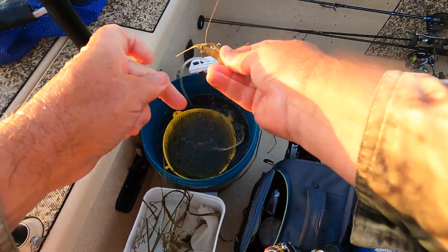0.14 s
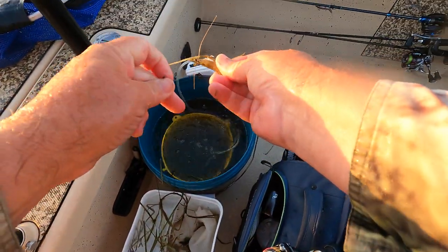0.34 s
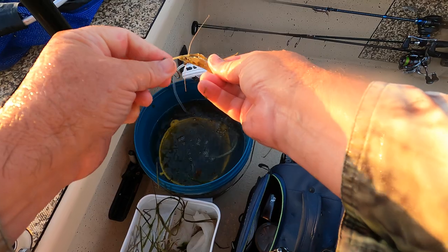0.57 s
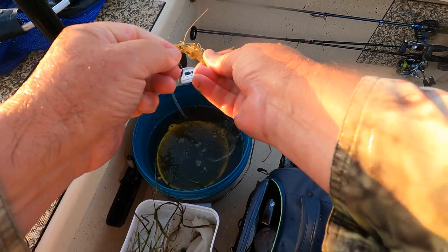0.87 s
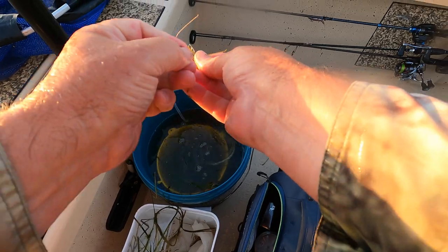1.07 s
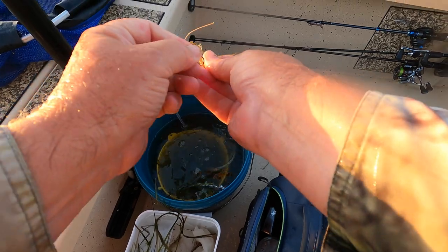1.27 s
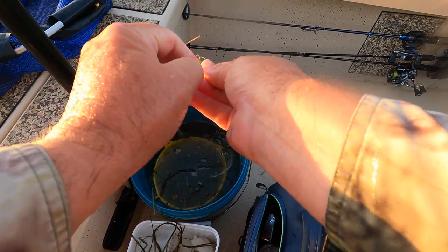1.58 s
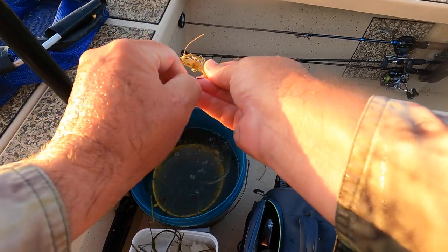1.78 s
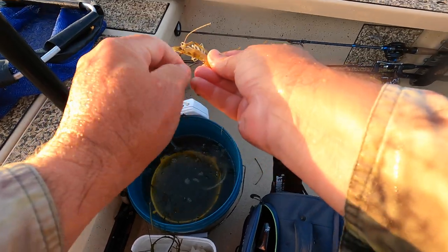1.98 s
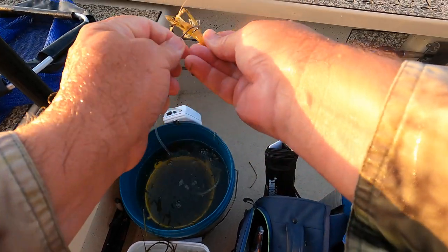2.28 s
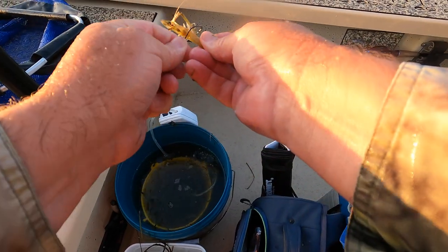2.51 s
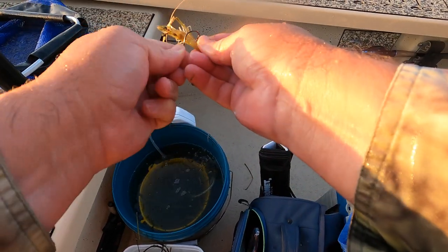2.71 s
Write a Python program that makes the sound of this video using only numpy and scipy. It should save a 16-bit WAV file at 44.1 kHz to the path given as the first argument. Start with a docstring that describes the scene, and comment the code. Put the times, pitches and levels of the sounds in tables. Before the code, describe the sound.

An aerator bubbles in a bucket of water, low gurgle and fine fizz, with small clicks

```python
"""A low wet gurgle under a wash of small bubbles and a fine fizz that swells and fades, with pops and ticks.
An aerator churns the water of a bait bucket: large and small bubbles are crowds of short rising tones
over shaped noise; fizz and a faint whistle are filtered noise. Wet pops, ticks and knocks of handling
come and go: tones in puffs of noise, bright noise bursts and ringing modes of the bucket.
The microphone housing colours everything."""
import sys
import numpy as np
from scipy import signal
from scipy.fft import rfft, irfft, next_fast_len
from scipy.io import wavfile
from scipy.ndimage import uniform_filter1d

SR = 44100
rng = np.random.default_rng(int(sys.argv[2]) if len(sys.argv) > 2 else 0)


def log_audio(samples):
    """Write samples as a 16-bit WAV file to the path given in sys.argv[1]."""
    # one column per channel
    frames = np.atleast_2d(samples).T
    # limit to full scale, then quantise
    limited = np.clip(frames, -1, 1)
    pcm = np.round(limited * 32767).astype(np.int16)
    wavfile.write(sys.argv[1], SR, pcm)


N = 125685  # length [samples]
EVENT_N = 4000  # length of one pop, click or knock [samples]


def amp(db):
    """Turns decibels into an amplitude factor."""
    return 10 ** (np.asarray(db) / 20)


def evened(x):
    """Scales a sound to unit RMS."""
    return x / np.sqrt(np.mean(x ** 2) + 1e-20)


def read(points, hz):
    """Reads a (frequency, value) table, interpolating along log frequency."""
    f, value = np.transpose(points)
    return np.interp(np.log(hz + 1), np.log(f + 1), value)


def level(curve, axis=1):
    """Draws one dB column of a table over time as an amplitude envelope."""
    columns = np.transpose(curve)
    db = np.interp(np.arange(N) / SR, columns[0], columns[axis])
    return amp(db)


def colour(x, points):
    """Filters a sound by a table of (frequency [Hz], gain [dB])."""
    size = next_fast_len(len(x) + 4096)  # room for the filter to ring out
    gain = amp(read(points, np.fft.rfftfreq(size, 1 / SR)))
    return irfft(rfft(x, size) * gain, size)[:len(x)]


def add(mix, s, sound):
    """Lays a sound into the mix at s seconds, cut off at the end."""
    part = mix[round(s * SR):][:len(sound)]
    part += sound[:len(part)]


def decay(t60, rise):
    """Envelope with a linear rise [s] over an exponential fall of 60 dB in t60 [s]."""
    t = np.arange(EVENT_N) / SR
    return np.minimum(t / rise, 1) * amp(-60 * t / max(t60, .004))


def narrow(noise, width):
    """Smooths complex noise with three equal poles, each width [Hz] wide, to unit power around zero."""
    r = np.exp(-np.pi * np.clip(width, 30, 9000) / SR)
    band = signal.lfilter([1], np.poly([r, r, r]), noise)
    return band / np.sqrt(np.mean(abs(band) ** 2))


def bubbles(tone, lo_hz, hi_hz, per_s, cycles, spread_db, glide, count=30):
    """Dying tones of rising pitch in many sizes at random moments; tone sets each size's share."""
    strength = amp(spread_db * np.minimum(rng.exponential(1, N), 5))
    starts = strength * (rng.random(N) < per_s / SR)
    kind = rng.integers(0, count, N)
    out = np.zeros(N)
    for k, hz in enumerate(np.geomspace(lo_hz, hi_hz, count)):
        u = np.arange(int(30 * SR / hz)) * hz / SR  # time in cycles of the starting pitch
        shape = (1 - np.exp(-u)) * np.exp(-2 * u / cycles)
        grain = shape * np.sin(2 * np.pi * u * (1 + glide * u / cycles))
        share = hz * amp(read(tone, hz))
        out += signal.oaconvolve(starts * (kind == k), grain * share)[:N]
    return evened(out)


def gurgle():
    """Large bubbles ring low over a soft rumble of stirred water with the same spectrum."""
    # Swell of the gurgle: (time [s], level [dB])
    swell = [(0.0, -42.5), (0.16, -41), (0.44, -38.5), (0.63, -37.5), (1.36, -43), (1.55, -43), (1.82, -40),
             (2.44, -40.5), (2.85, -42)]
    # Spectrum of large bubbles and rumble: (frequency [Hz], relative density [dB per Hz])
    spectrum = [(15, -81), (25, -75), (65, -16.5), (124, -17.5), (167, -9.5), (199, -11), (219, -8.5),
                (325, -0.5), (381, -3), (584, -18), (642, -17), (717, -21), (1100, -36), (1430, -14),
                (2420, -120)]
    big = bubbles(spectrum, 118.6, 890, per_s=260, cycles=5.8, spread_db=1, glide=0.059)
    rumble = evened(colour(rng.standard_normal(N), spectrum))
    return level(swell) * (0.68 * big + 0.8 * rumble)


def wash():
    """Small bubbles ring in a dense crowd over hiss, with single drops chirping out of it."""
    # Swell of the wash: (time [s], level of the dull part [dB], level of the bright part [dB])
    swell = [(0.0, -54.5, -55.5), (0.28, -52, -53.5), (0.55, -51.5, -55), (0.86, -53, -55.5),
             (1.05, -53, -56), (1.32, -53.5, -54.5), (1.48, -53, -59.5), (1.73, -54.5, -56),
             (1.91, -53, -52.5), (2.56, -55, -62.5), (2.85, -57.5, -57)]
    # Spectrum of small bubbles and hiss: (frequency [Hz], relative density [dB per Hz])
    spectrum = [(500, -16), (760, -3), (860, 2), (980, -4), (1300, -4), (1600, -7.5), (2000, -6.5),
                (2400, -7), (3000, -11), (3800, -9), (5000, -15), (7000, -30.5), (14000, -61)]
    # Spectrum of the single drops: (frequency [Hz], relative level [dB])
    drop_spectrum = [(1100, -14), (2000, -3), (3500, -7.5), (7000, -16)]
    # Crossover from dull to bright: (frequency [Hz], share of the bright part [0 to 1])
    crossover = [(1300, 0), (2300, 0.96)]
    small = bubbles(spectrum, 722, 7100, per_s=3300, cycles=6.7, spread_db=2.5, glide=0.048)
    drops = bubbles(drop_spectrum, 1100, 6630, per_s=160, cycles=12.5, spread_db=3.0, glide=0.037)
    hiss = evened(colour(rng.standard_normal(N), [(200, -34)] + spectrum))
    crowd = 0.69 * small + amp(-12.5) * drops + 0.72 * hiss
    bright_share = np.clip(read(crossover, np.fft.rfftfreq(N, 1 / SR)), 0, 1)
    bright = irfft(rfft(crowd) * bright_share, N)
    dull = crowd - bright
    return level(swell) * evened(dull) + level(swell, axis=2) * evened(bright)


def fizz():
    """Fine high hiss whose level flickers a little at random."""
    # Swell and fade of the fizz: (time [s], level [dB])
    swell = [(0.0, -68), (0.13, -53), (0.28, -53), (0.65, -51.5), (1.27, -60), (1.4, -64), (1.66, -68),
             (1.9, -66.5), (2.09, -65.5), (2.49, -73.5), (2.85, -65.5)]
    # Spectrum of the hiss: (frequency [Hz], relative density [dB per Hz])
    spectrum = [(2500, -2), (4200, -4), (5000, -1), (5500, -7.5), (6200, -6), (8000, -10), (11000, -9),
                (14000, -15)]
    flicker = evened(uniform_filter1d(rng.standard_normal(N), 300))  # smoothed over 300 samples
    hiss = evened(colour(rng.standard_normal(N), [(1000, -42)] + spectrum))
    return level(swell) * amp(1.06 * flicker) * hiss  # flicker of 1.06 dB RMS


def pops():
    """Each wet pop is a short tone inside a puff of noise around its pitch."""
    # Wet pops and ticks:
    # (time [s], level [dB], pitch [Hz], width of each smoothing pole [Hz], t60 [s])
    puffs = [(.005,-35,1750,500,0.069),(.014,-48.5,6100,2000,0.032),(.024,-35.5,1910,500,0.047),(.102,-43,5450,500,.03),(.114,-44,4000,1200,.02),(.153,-36,4400,3000,0.027),(0.1628,-27.5,3940,3000,0.039),(0.1639,-20,2394,1500,0.023),(0.1636,-23.5,1687,490,0.034),(0.178,-37,2690,2500,0.052),(.325,-25,2086,1500,0.025),(.329,-34,1484,500,0.054),(.331,-25.5,470,120,0.095),(0.331,-41,2550,500,.05),(.435,-39,3650,300,.03),(0.575,-40,2370,1200,0.038),(0.5943,-31,2275,2000,0.031),(0.5949,-25,880,250,.05),(.6,-29.5,135,30,.14),(.614,-25,388,100,.06),(.629,-29,312.6,60,.2),(.654,-26,448,100,0.092),(.76,-46,6170,400,.03),(0.9682,-30.5,1420,503,0.062),(0.97,-35,1400,2000,0.13),(0.9698,-36.5,2550,800,0.074),(.986,-29.5,1405,714,0.072),(.989,-38.5,2570,604,0.11),(0.9983,-35.5,1570,1000,0.036),(1.187,-34,3470,600,.03),(1.189,-43.5,4470,3000,0.071),(1.21,-48,5600,800,0.03),(1.272,-43.5,2305,2500,0.17),(1.2885,-35,6530,2000,0.034),(1.29,-41.5,3000,2500,0.16),(1.302,-35.5,3570,605,0.078),(1.314,-35.5,5450,3020,0.068),(1.316,-22.5,3895,524,0.05),(1.322,-35.5,1450,400,0.053),(1.334,-37.5,2510,2500,0.032),(1.35,-43,5200,1500,.03),(1.385,-42.5,4930,1500,0.036),(1.385,-45,2360,600,.03),(1.407,-40.5,2300,403,0.072),(1.441,-30.5,4900,1190,0.031),(1.442,-35.5,2385,250,0.064),(1.494,-44.5,1990,1200,0.069),(1.499,-45,3180,2000,0.057),(1.545,-49.5,3020,800,0.054),(1.655,-42,5000,1800,0.021),(1.717,-46,6000,3000,.02),(1.739,-40.5,1260,400,0.046),(1.74,-42.5,7240,905,0.077),(1.745,-60,8270,150,.15),(1.745,-58,6800,150,.12),(1.741,-44,3500,4000,.06),(1.745,-40.5,4250,900,0.043),(1.959,-40.5,3800,300,0.074),(2.055,-41,1335,900,0.083),(2.095,-41,2090,500,0.037),(2.321,-44.5,1746,300,0.042),(2.452,-55,5600,1000,0.035),(2.499,-52.5,6170,500,0.084),(2.5094,-46.5,2050,300,0.035),(2.533,-45.5,3000,400,.04),(2.58,-52,4470,500,0.026),(2.6784,-40,4710,400,0.024),(2.769,-43,2700,1000,.03),(2.7756,-39,2000,600,0.036),(2.8323,-34,2430,1500,0.026)]
    rise_s, rise_cycles, tone_share = 0.00074, 0.8, 0.8
    out, t = np.zeros(N), np.arange(EVENT_N) / SR
    noises = rng.standard_normal((len(puffs), 2, EVENT_N + 500))
    for (s, db, hz, width, t60), (a, b) in zip(puffs, noises):
        shape = decay(t60, rise_s + rise_cycles / hz)
        puff = narrow(a + 1j * b, width)[500:]  # skips the filter's settling
        carrier = np.exp(2j * np.pi * hz * t)
        pop = shape * ((puff + tone_share) * carrier).imag
        # Give every pop the energy of a plain sine under the same envelope
        match = np.linalg.norm(shape) / np.linalg.norm(pop) / np.sqrt(2)
        add(out, s, amp(db) * pop * match)
    return out


def clicks():
    """Bright noise ticks snap with a short hiss behind them, among fainter stray ones."""
    # Thin bright clicks: (time [s], level before the common gain [dB], t60 of the hiss tail [s])
    ticks = [(0.0285, -51.5, 0.028), (0.102, -43, 0.047), (0.9478, -46, 0.056), (1.271, -49, 0.07),
             (1.2902, -43, 0.04), (1.2974, -52, 0.12), (1.3124, -52, 0.03), (1.332, -45.5, 0.053),
             (1.3848, -51.5, 0.04), (1.4397, -43.5, 0.028), (1.5544, -60, 0.045), (1.6412, -51, 0.04),
             (1.7035, -61, 0.04), (1.74, -48, 0.045), (1.7998, -54, 0.04), (1.9689, -60, 0.04),
             (2.0727, -60, 0.04), (2.1291, -62, 0.04), (2.2603, -69, 0.04), (2.2997, -60, 0.04),
             (2.3207, -54, 0.048), (2.4972, -58, 0.04), (2.6813, -59, 0.04)]
    # Spectrum of every click: (frequency [Hz], gain [dB])
    spectrum = [(2000, -35), (5000, -0.5), (8000, -3.5), (11000, 1), (14000, -2)]
    gain_db, tail_db = 5.5, -3.5  # the tail is relative to the snap
    stray_per_s, stray_db, stray_spread_db = 40, -66, 1.3
    envelope = np.zeros(N)
    snap = decay(0.0058, 0.00041)
    for s, db, t60 in ticks:
        tail = amp(tail_db) * decay(t60, 0.00071)
        add(envelope, s, amp(db + gain_db) * (snap + tail))
    moments = rng.random(N) < stray_per_s / SR
    stray = moments * amp(stray_db + stray_spread_db * rng.standard_normal(N))
    envelope += signal.oaconvolve(stray, decay(0.034, 0.00023))[:N]
    return colour(envelope * rng.standard_normal(N), [(800, -48)] + spectrum)


def knocks():
    """Blows ring the plastic wall of the bucket; the low modes swell later than the high ones."""
    # Knocks on the bucket: (time [s], level applied to the summed modes [dB])
    blows = [(.326, -17.5), (.595, -18), (1.27, -24)]
    # Modes of the bucket wall: (frequency [Hz], level before halving [dB], t60 [s])
    modes = [(135, -15, 0.11), (216, -6.5, 0.16), (319.7, -3.5, 0.16), (470, -2, 0.061), (865, -8.5, 0.055),
             (1420, -12.5, 0.042)]
    t = np.arange(EVENT_N) / SR
    ring = np.zeros(EVENT_N)
    for hz, db, t60 in modes:
        shape = decay(t60, 1.16 / hz)  # rises over 1.16 cycles
        ring += .5 * amp(db) * shape * np.sin(2 * np.pi * hz * t)
    out = np.zeros(N)
    for s, db in blows:
        add(out, s, amp(db) * ring)
    return out


def whistle():
    """Faint narrow noise around a gliding pitch, airy as of air through a small gap."""
    # Whistle in the fizz: (time [s], level [dB], pitch [Hz])
    path = [(.1, -85, 4830), (.17, -54.5, 4800), (.65, -56.5, 4800), (1.0, -59, 4760), (1.11, -64, 4800),
            (1.14, -82, 4800)]
    s, _, hz = np.transpose(path)
    a, b = rng.standard_normal((2, N))
    pitch = np.interp(np.arange(N) / SR, s, hz)
    carrier = np.exp(2j * np.pi * np.cumsum(pitch) / SR)
    return level(path) * (narrow(a + 1j * b, width=420) * carrier).real


def scene():
    """Sums the churned water, its airy layers and the handling sounds into one channel."""
    water = gurgle() + wash() + fizz() + whistle()
    return (water + pops() + clicks() + knocks())[None]


def record(dry):
    """The microphone housing notches the treble; a steep low-pass then limits the band."""
    # Response of the microphone in its housing: (frequency [Hz], gain [dB])
    response = [(7500, -0.5), (8800, -8), (9050, -25), (9150, -36), (9300, -9), (9600, -11.5), (10800, -3),
                (11600, -8), (12000, -20), (12800, -10), (13500, -18), (14000, -31)]
    heard = colour(dry[0], response)[None]
    low_pass = signal.firwin(511, 14200, window=("kaiser", 9), fs=SR)  # edge in Hz
    return signal.oaconvolve(heard, low_pass[None], "same")


dry = scene()
out = record(dry)
log_audio(out)
```